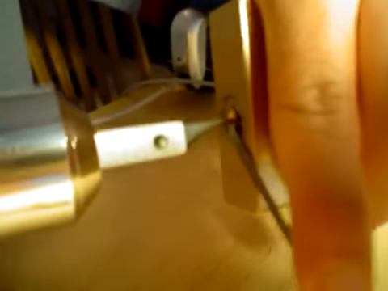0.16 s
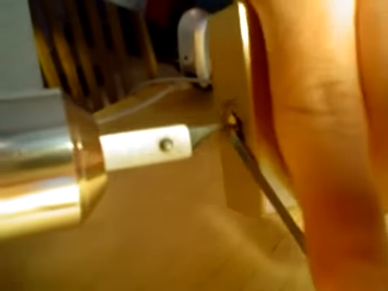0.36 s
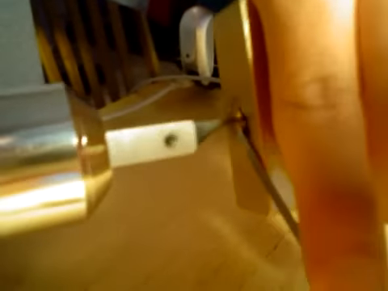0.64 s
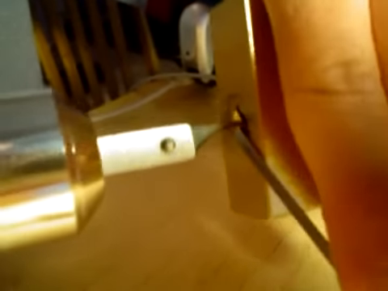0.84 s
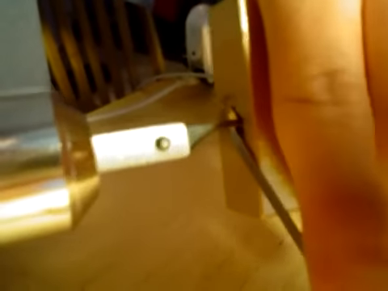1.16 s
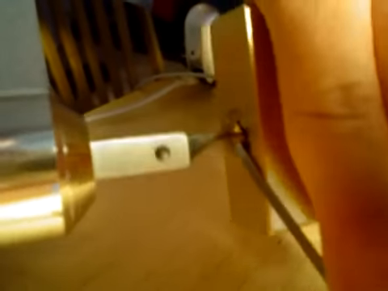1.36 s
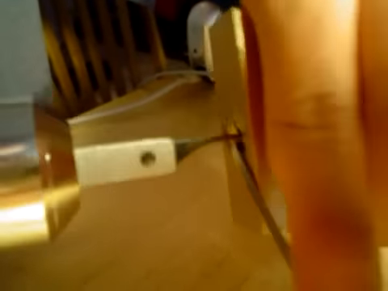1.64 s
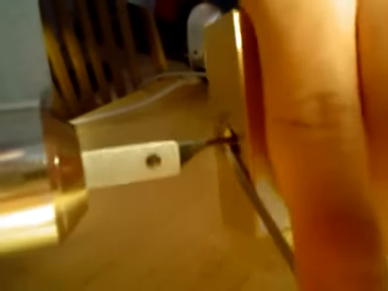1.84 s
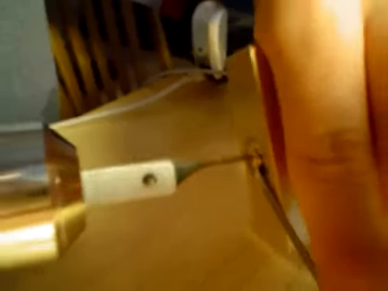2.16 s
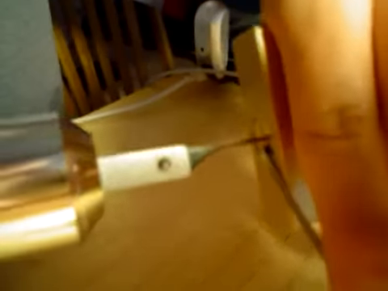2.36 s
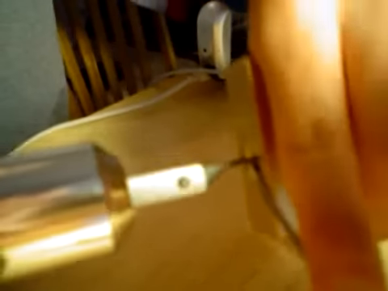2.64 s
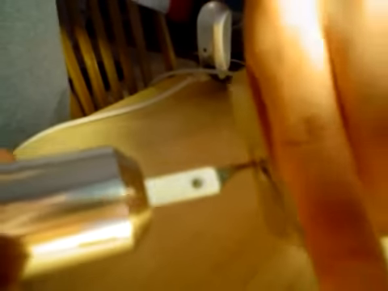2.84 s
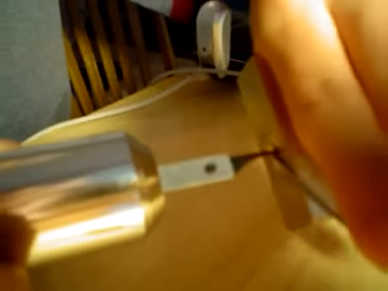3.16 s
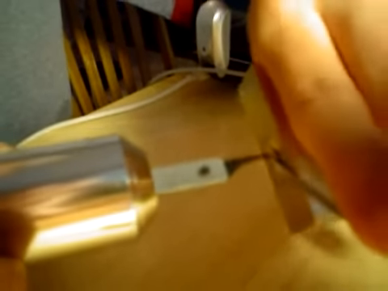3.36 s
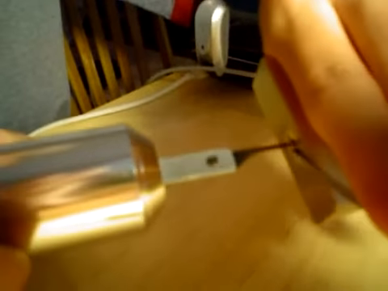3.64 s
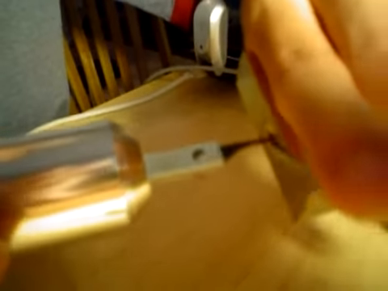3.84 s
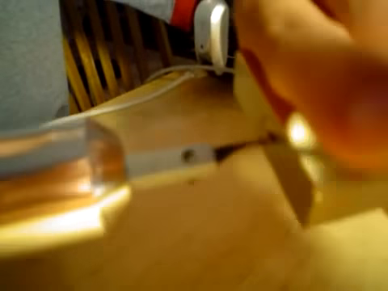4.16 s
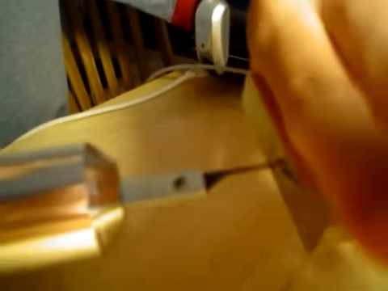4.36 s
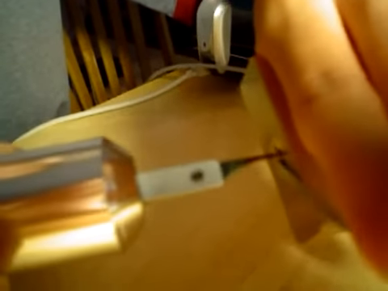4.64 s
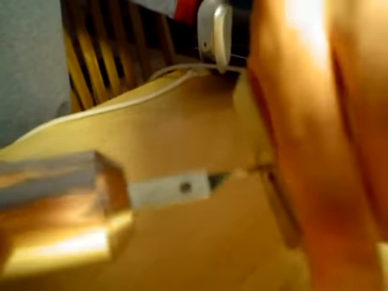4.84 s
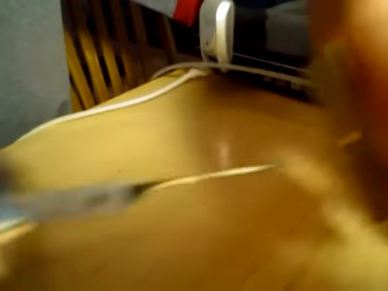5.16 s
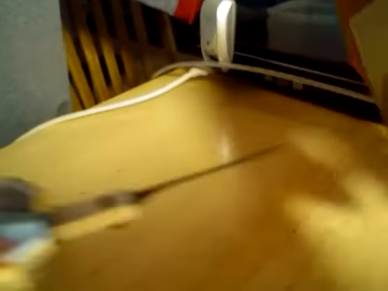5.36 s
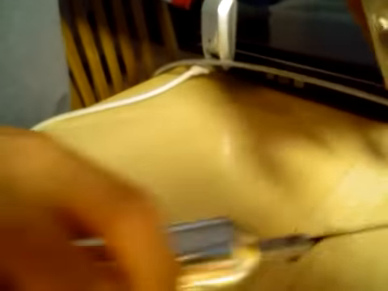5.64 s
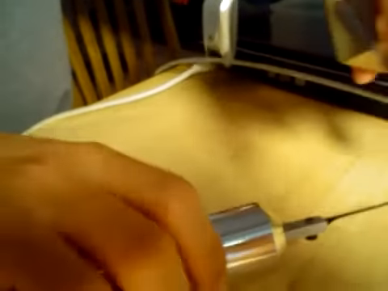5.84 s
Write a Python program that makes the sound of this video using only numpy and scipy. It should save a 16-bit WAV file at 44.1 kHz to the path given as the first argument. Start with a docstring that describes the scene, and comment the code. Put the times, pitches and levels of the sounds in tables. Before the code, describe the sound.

A close microphone in a small furnished room catches an electric pick working a padlock above a wooden desk. Eleven rattling buzzes, each roughly 0.2 to 0.35 seconds long, start near 0.0, 0.4, 0.9, 1.25, 1.6, 2.05, 2.8, 3.3, 3.8, 4.4 and 4.9 seconds. Each spins up fast to around a hundred gritty needle blows per second, then coasts down in slower, softer clicks. Steel rings brightly through the chatter; a few blows stick and break free with a tiny gap, around 1.1, 1.7 and 4.0. Faint single ticks fall between bursts, clearest near 0.87 and 4.34. The tone grows more hollow and knocking from about 2.8 as the lock is cupped. A faint fan hum and low rumble continue throughout. At 5.52 the pick bumps softly down and rubs along the desk; at 5.84 a loud, clipped woody-metallic knock rings, with a smaller one at 5.93.

```python
"""Electric lock pick in a padlock

An electric lock pick runs in short bursts in a padlock held over a wooden desk, close to the microphone.
Each motor turn flings the needle against the pins and lets it slap back: impulses excite chatter and resonances.
The motor spins up and coasts down every time; single ticks of the needle or pins fall just before, after or
between the bursts. A fan hums in the small room as narrow noise bands; at the end the pick and the lock are put
down and ring decaying modes of barrel and desk.
"""
import sys
import numpy as np
from scipy import signal
from scipy.fft import rfft, irfft
from scipy.io import wavfile

SR = 44100
rng = np.random.default_rng(int(sys.argv[2]) if len(sys.argv) > 2 else 0)


def to_wav(s):
    """Save 16-bit WAV."""
    ch = np.atleast_2d(s).T  # columns
    pcm = np.round(np.clip(ch, -1, 1) * 32767)  # PCM
    wavfile.write(sys.argv[1], SR, pcm.astype(np.int16))


N = 264159
TIME = np.arange(N) / SR  # s

# soft bumps of the pick's barrel on the desk: start_s, level_db
BARREL_BUMPS = [(5.523, -28.5), (5.554, -32), (5.617, -43.5)]


def from_db(db):
    """Logarithmic level: decibels to an amplitude gain."""
    return 10 ** (np.asarray(db) / 20)


def unit_energy(x):
    """Energy normalization: the squares of the result sum to one."""
    return x / np.sqrt(np.sum(x ** 2) + 1e-20)


def through(x, response):
    """Linear superposition: convolve with a causal impulse response."""
    return signal.fftconvolve(x, response)[:N]


def colour(points, size=4096):
    """Minimum phase: fold the cepstrum of a spectral shape (frequency_hz, level_db) into a causal response."""
    hz, db = np.transpose(points)
    grid = np.maximum(np.fft.rfftfreq(size, 1 / SR), 1)
    level_db = np.interp(np.log(grid), np.log(hz), db)
    cepstrum = irfft(np.log(from_db(level_db)))
    cepstrum[1:size // 2] *= 2
    cepstrum[size // 2 + 1:] = 0
    return unit_energy(irfft(np.exp(rfft(cepstrum))))


def clicks(times, gains):
    """Impulsive excitation: each blow is a single sample."""
    at = np.clip(np.round(np.asarray(times) * SR).astype(int), 0, N - 1)
    return np.bincount(at, gains, N)


def single_blows(rows, force_db):
    """Impulsive excitation: one blow for each row of time and level."""
    times, level_db = np.transpose(rows)
    return clicks(times, from_db(level_db + force_db))


def dying(power, t60, rise=.0001):
    """Exponential energy decay: smear each blow's energy over a quick rise and a decay; return an amplitude."""
    decay_pole = np.exp(-2 * np.log(1000) / (t60 * SR))
    rise_pole = np.exp(-1 / (rise * SR))
    for r in decay_pole, rise_pole:
        power = signal.lfilter([1 - r], [1, -r], power + 1e-18)
    return np.sqrt(power)


def dense_ring(t60, size=30000):
    """Modal overlap: countless overlapping modes sound as noise that dies away."""
    decay = np.exp(-np.log(1000) * TIME[:size] / t60)
    return unit_energy(rng.standard_normal(size) * decay)


def resonance(x, hz, width_hz):
    """Damped oscillator: a two-pole resonance with gain 1 at its peak."""
    r = np.exp(-np.pi * width_hz / SR)
    zeros = np.array([1, 0, -1]) * (1 - r * r) / 2
    poles = [1, -2 * r * np.cos(2 * np.pi * hz / SR), r * r]
    return signal.lfilter(zeros, poles, x + 1e-18)


def ring(blows, hz, t60):
    """Free vibration: a unit blow starts a decaying sine of initial height 1."""
    r = np.exp(-np.log(1000) / (t60 * SR))
    w = 2 * np.pi * hz / SR
    return signal.lfilter([0, np.sin(w)], [1, -2 * r * np.cos(w), r * r], blows + 1e-18)


def cut(x, hz, kind):
    """Band limitation: a second-order low- or high-pass."""
    return signal.sosfilt(signal.butter(2, hz, kind, fs=SR, output="sos"), x)


def in_time(rows):
    """Piecewise-linear control: join the rows of a curve by straight lines."""
    s, *columns = np.transpose(rows)
    return [np.interp(TIME, s, column) for column in columns]


def pick_motor(start, release, last_kick, top, spin_up, force_db, first_db, count=48):
    """Cam-driven impacts: motor phase, the integral of speed, times the needle's blows and carries the hum."""
    # motor hum at top speed: multiple_of_speed, level_db
    hum_orders = [(2, -69), (3, -55.5), (4, -50.5), (5, -48)]
    run_out_s = .032  # from the last kick to standstill
    last_kick_db, coast_loss_db = -10.5, -15.5  # the loss builds up over the whole coast

    age = np.maximum(TIME - start, 0)
    coasted = np.clip((TIME - release) / (last_kick + run_out_s - release), 0, 1)
    spun_up = 1 - .8 * np.exp(-age / spin_up)
    speed = top * spun_up * (1 - coasted) * (TIME >= start)  # turns/s
    turns = np.cumsum(speed) / SR
    turning = speed > 0

    # the needle hits once a turn and slaps back before half the turn is over, at the latest by its own spring
    chance = rng.standard_normal((4, count))
    turn = np.arange(count)
    hits = np.interp(turn, turns[turning], TIME[turning])
    driven_slaps = np.interp(turn + .41, turns[turning], TIME[turning])
    slaps = np.minimum(driven_slaps, hits + .0085)
    when = np.array([hits + .0001 * chance[0], slaps + .00018 * chance[1]])
    contact_db = np.array([[0], [-3.5]]) + 1.4 * chance[2:]

    # the first turn takes up the slack; an unpowered motor hits ever more softly
    loss_db = first_db * (turn == 0) + coast_loss_db * np.interp(when, TIME, coasted)
    gains = from_db(force_db + loss_db + contact_db) * (when < last_kick)
    # the spring throws the needle one last time, then it rests
    kick = clicks([last_kick], [from_db(force_db + last_kick_db)])

    hum = np.zeros(N)
    for order, db in hum_orders:
        hum[turning] += from_db(db) * np.sin(2 * np.pi * round(order) * turns[turning])
    return clicks(when.ravel(), gains.ravel()) + kick, hum * (speed / top) ** 2


def jammed(blows):
    """Stick and release: a blow wedges the needle, it is silent while it sticks, and another blow frees it."""
    # the needle wedges under a pin and breaks free: stick_s, free_s, freeing_level_db
    jam_times = [(1.08, 1.1023, -6), (1.679, 1.7127, 3.5), (3.9912, 4.01, 3), (4.077, 4.1, 1.5)]
    wedge_db = -2  # the wedging blow against the freeing one
    sticks, frees, level_db = np.transpose(jam_times)
    moving = np.all([(TIME < begin) | (TIME > end) for begin, end in zip(sticks, frees)], axis=0)
    wedging = clicks(sticks, from_db(level_db + wedge_db))
    freeing = clicks(frees, from_db(level_db))
    return blows * moving + wedging + freeing


def pin_chatter(blows):
    """Random multiple impact: each blow catches other pins, so its gritty burst has a new colour every time."""
    edges = np.geomspace(900, 11000, num=8)  # Hz
    out = np.zeros(N)
    for low, high in zip(edges, edges[1:]):
        strength = blows * from_db(3.2 * np.clip(rng.standard_normal(N), -2, 2))
        grit = rng.standard_normal(N) * from_db(2.5 * rng.standard_normal(N))
        burst = grit * dying(strength ** 2, t60=.0095, rise=.001)
        out += signal.sosfilt(signal.butter(2, [low, high], "band", fs=SR, output="sos"), burst)
    return out


def lock_rattle(blows, grip):
    """Forced modal response: blows push the lock body, ring its casing and set the pins chattering."""
    # rattle colour with the lock held open, and cupped: frequency_hz, level_db
    open_colour = [(71, -61.5), (120, -21), (250, -22), (485, -24), (639, -3.5), (873, -3), (1090, -8),
                   (1690, -15.5), (1920, -8.5), (2190, -11), (2630, -2), (4170, 0.5), (4740, -8),
                   (9700, -8.5), (12600, -49), (21300, -120)]
    cupped_colour = [(71, -60), (120, -30), (194, -6.5), (442, -12), (940, 2.5), (1150, -16), (1330, 2),
                     (1660, -7.5), (1960, 1.5), (2680, -1.5), (3870, -9.5), (6240, -8), (7230, -3.5),
                     (9700, -10), (12600, -40.5), (21300, -120)]
    # resonances of needle and lock body: frequency_hz, width_hz, level_db
    steel_modes = [(650, 197, -1), (950, 65, -22), (1105, 46, -7), (1340, 40, -31), (2080, 44, -38.5),
                   (2530, 18, 6.5), (2490, 11, -5), (2717, 15, 10), (3144, 53, -8), (4310, 94, -14.5),
                   (4170, 110, 6), (5450, 190, -8.5), (7005, 157, 7.5), (8930, 500, -3.5)]

    chatter = pin_chatter(blows)
    slow_start = 1 - np.exp(-TIME[:2000] / .0008)
    casing = unit_energy(dense_ring(t60=.012, size=2000) * slow_start)
    # the snap of a caught pin varies from blow to blow
    snap = blows * from_db(4 * np.clip(rng.standard_normal(N), -1.5, 1.5))
    clatter = from_db(-6) * through(blows, casing) + from_db(-1.5) * chatter + from_db(-4) * snap

    # the low part takes the unvaried blows and so carries the pitch of the motor
    contact = cut(clatter, 1000, "high") + from_db(-5) * cut(blows, 1200, "low")
    held_open = through(contact, colour(open_colour))
    cupped = through(contact, colour(cupped_colour))
    body = (1 - grip) * held_open + grip * cupped

    ringing = np.zeros(N)
    for k, (hz, width_hz, db) in enumerate(steel_modes):
        ringing += (-1) ** k * from_db(db) * resonance(contact, hz, width_hz)  # alternating polarity

    # a lock that is cupped in the hand sits loosely and knocks dully against the wrench
    knock = grip * (resonance(snap, 627, width_hz=140) - 0.71 * resonance(snap, 343, width_hz=72))
    shudder = cut(cut(snap, 130, "low"), 68, "high")
    return from_db(4.0) * body + from_db(5.5) * ringing + from_db(-0.5) * knock + from_db(-9.5) * shudder


def barrel():
    """Impact and friction: the pick bumps softly onto the desk and slides with a faint rubbing tone."""
    # low modes rung by the bumps: frequency_hz, level_db, t60_s
    barrel_modes = [(115, -13.5, 0.43), (170.6, -16, 0.32), (200, -32, 0.36), (244, 1.5, 0.16),
                    (318, -6, 0.068)]
    # the barrel slides over the desk: time_s, rustle_db, rubbing_tone_db
    slide_curve = [(5.51, -100, -100), (5.53, -48, -90), (5.63, -55, -75), (5.66, -48, -48),
                   (5.72, -55, -46), (5.75, -44, -64), (5.82, -59, -71), (5.85, -100, -90)]

    blows = single_blows(BARREL_BUMPS, 0)
    thud = sum(from_db(db) * ring(blows, hz, t60) for hz, db, t60 in barrel_modes)
    rustle_db, tone_db = in_time(slide_curve)
    rustle_colour = colour([(70, -15.5), (150, -8.0), (600, -3.5), (1200, 0), (2500, -6.5), (9000, -14.5)])
    rustle = through(rng.standard_normal(N), rustle_colour)
    narrow = resonance(rng.standard_normal(N), 402, width_hz=15)
    tone = unit_energy(resonance(narrow, 402, width_hz=15)) * np.sqrt(N)  # RMS 1
    return thud + from_db(rustle_db) * rustle + from_db(tone_db) * tone


def desk():
    """Modal impact: metal set down on wood gives a crack, the modes of the desk top and a dense dull ring."""
    # knocks on the desk: start_s, level_db, contact_bandwidth_hz, crack_db
    knock_rows = [(5.8355, -3, 2500, -6.5), (5.8496, -29, 705, -23), (5.862, -33, 877, -23),
                  (5.9298, -21.5, 1400, -4.5)]
    # desk top: frequency_hz, level_db, t60_s
    desk_modes = [(143, -27, 0.18), (230, -41, 0.18), (339, -8.5, 0.18), (433, -32, 0.073),
                  (507, -9.5, 0.1), (630, -31, 0.1), (695, -19, 0.056), (724, 2.5, 0.024), (810, -3, 0.032),
                  (950, -12.5, 0.16), (1258, -4.5, 0.052), (1470, -25, .1), (1950, -22, .06),
                  (2734, 1, 0.026), (3130, -23, 0.13)]
    # colour of the crack, and of the dense ring after it: frequency_hz, level_db
    crack_colour = [(59, -23), (100, -68), (350, -21), (1030, 0), (2140, -13), (2700, -8), (3530, -22),
                    (5610, -16.5), (10000, -48), (13000, -69), (22000, -120)]
    boom_colour = [(35, -64), (60, -32), (226, 1), (421, 3), (458, -3.5), (619, 6.5), (909, -0.5),
                   (1590, -8.5), (1800, -14), (2600, -14), (5980, -38.5), (10000, -49), (13000, -88),
                   (22000, -120)]

    times, level_db, contact_hz, crack_db = np.transpose(knock_rows)
    modes = np.zeros(N)
    for hz, db, t60 in desk_modes:
        # a soft contact reaches only the low modes
        gains = from_db(level_db + db) / (1 + (hz / contact_hz) ** 2)
        modes += ring(clicks(times, gains), hz, t60)
    crack_power = clicks(times, from_db(level_db + crack_db)) ** 2
    crack = rng.standard_normal(N) * dying(crack_power, t60=0.036)
    boom_power = clicks(times, from_db(level_db)) ** 2
    boom = rng.standard_normal(N) * dying(boom_power, t60=0.6)
    coloured_crack = from_db(25.5) * through(crack, colour(crack_colour))
    coloured_boom = from_db(23) * through(boom, colour(boom_colour))
    return from_db(4.0) * modes + coloured_crack + coloured_boom


def room(x):
    """Diffuse reverberation: a small furnished room adds a decaying tail, strongest in the low treble."""
    walls = colour([(200, -8.0), (1000, 3), (1800, -0.5), (2500, 2.0), (3400, -5.0), (4800, -3.5),
                    (10000, -16.5)])
    late = np.pad(dense_ring(t60=0.44), (int(.008 * SR), 0))  # starts after 8 ms
    return x + from_db(-20) * through(through(x, walls), late)


def background():
    """Filtered noise: steady air, narrow wavering fan tones, and a deep rumble that comes and goes."""
    # room air: frequency_hz, level_db
    air_colour = [(15, -26), (25, -1), (65, -30), (200, -16), (271, -9.5), (470, -12), (506, -24.5),
                  (603, -10), (815, -27.5), (972, -19.5), (1220, -21), (1380, -22.5), (1690, -26),
                  (10000, -35.5), (13000, -56.5), (22000, -120)]
    # fan tones: frequency_hz, level_db
    fan_tones = [(260, -66), (335, -69.5), (452, -72)]

    air = from_db(-55) * through(rng.standard_normal(N), colour(air_colour))
    tones = np.zeros(N)
    for hz, db in fan_tones:
        tones += from_db(db) * unit_energy(resonance(rng.standard_normal(N), hz, width_hz=3.6))
    swell_db = 11.0 * np.interp(TIME, np.linspace(0, TIME[-1], num=50), rng.standard_normal(size=50))
    deep_noise = cut(rng.standard_normal(N), 26, "low")
    rumble = from_db(-66.5) * unit_energy(deep_noise * from_db(swell_db))
    return air + (tones + rumble) * np.sqrt(N)  # from unit energy to unit RMS


def scene():
    """Superposition: pick, pins and lock reverberate; barrel, desk and background are added directly."""
    # trigger pulls: first_blow_s, release_s, last_kick_s, top_speed_turns_per_s, spin_up_s, force_db,
    # first_turn_db
    trigger_pulls = [(0.015, 0.154, 0.26, 101.3, 0.058, 0.5, -4.5),
                     (0.401, 0.571, 0.67, 91, 0.036, -0.5, -4.5),
                     (0.9041, 1.025, 1.1444, 93.7, 0.018, -1, 0),
                     (1.2587, 1.405, 1.485, 92, 0.043, -1, -5.5),
                     (1.6138, 1.754, 1.832, 84.4, 0.059, -2, -6.5),
                     (2.0614, 2.342, 2.427, 109.7, 0.033, -1, -3.5),
                     (2.7755, 2.965, 3.056, 107.3, 0.034, -1, -5.5),
                     (3.3102, 3.486, 3.624, 111.3, 0.0507, -0.5, -8),
                     (3.8239, 4.067, 4.134, 90, 0.032, -0.94, -7.5),
                     (4.3976, 4.602, 4.68, 114, 0.02, -1, -1.5),
                     (4.888, 5.017, 5.08, 73.3, 0.029, -1.5, -2)]
    # single ticks of the needle or pins just before, after or between the bursts: start_s, level_db
    stray_ticks = [(0.7254, -27), (0.821, -33), (0.8659, -21.5), (1.9815, -37), (2.5874, -30),
                   (3.104, -28.5), (4.3387, -23), (5.1379, -27)]
    # the hand closes round the lock: time_s, grip (0 = held open, 1 = cupped)
    grip_curve = [(0, 0.2), (1.4, 0.29), (2.4, 0.24), (2.8, 0.46), (3.5, 0.47), (3.95, 0.63), (4.6, 0.51),
                  (5.1, 0.54)]

    blows, hum = np.sum([pick_motor(*pull) for pull in trigger_pulls], axis=0)
    grip, = in_time(grip_curve)
    ticks = single_blows(stray_ticks, force_db=8)
    jolt = single_blows(BARREL_BUMPS[:1], force_db=16.5)  # the first bump shakes the needle
    rattle = lock_rattle(jammed(blows) + ticks + jolt, np.clip(grip, 0, 1))
    return (room(rattle + hum) + barrel() + desk() + background())[None]


def record(dry):
    """Saturation and band limitation: the loudest knock overloads the input; the top is cut steeply."""
    cutoff_hz = 10100
    clipped = np.clip(dry, -1, 1)
    return signal.sosfilt(signal.ellip(10, .3, 78, cutoff_hz, fs=SR, output="sos"), clipped)


dry = scene()
out = record(dry)
to_wav(out)
```